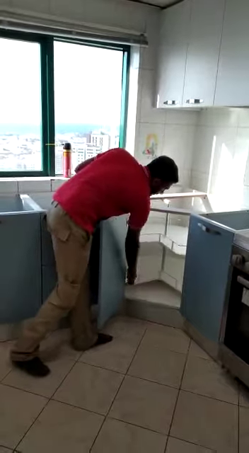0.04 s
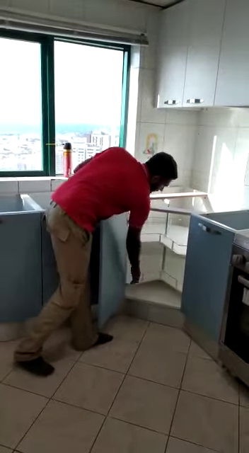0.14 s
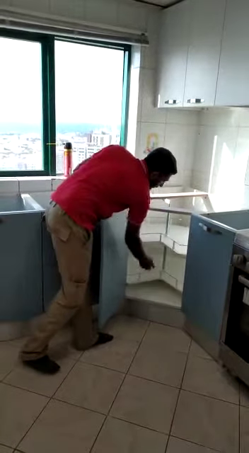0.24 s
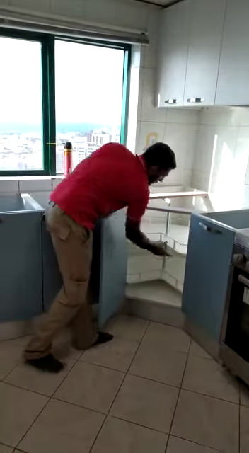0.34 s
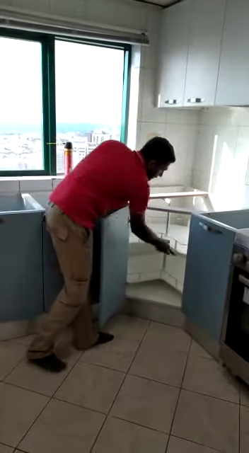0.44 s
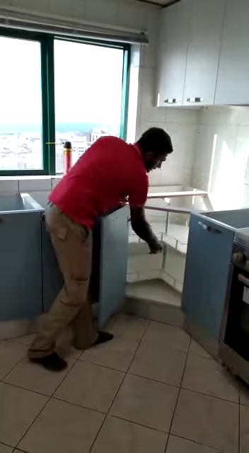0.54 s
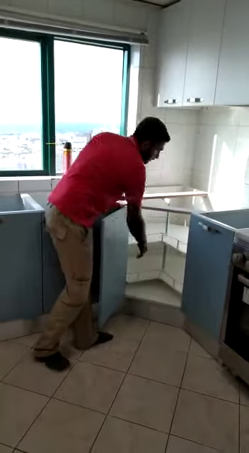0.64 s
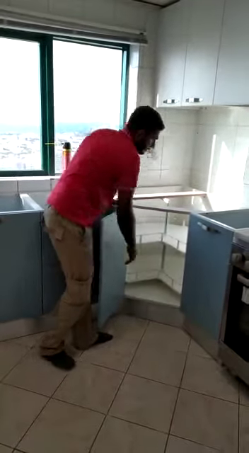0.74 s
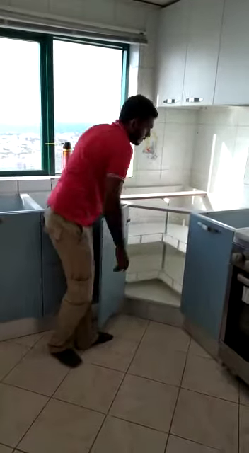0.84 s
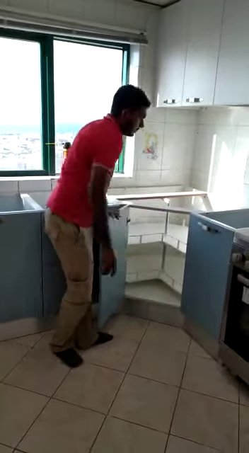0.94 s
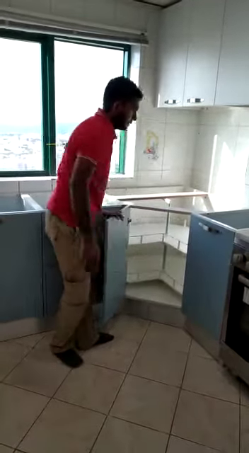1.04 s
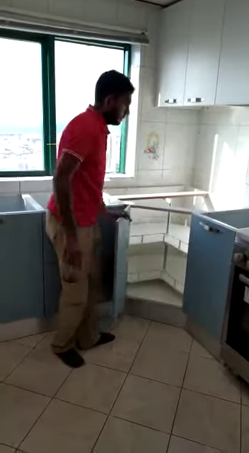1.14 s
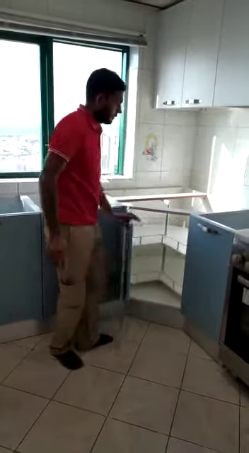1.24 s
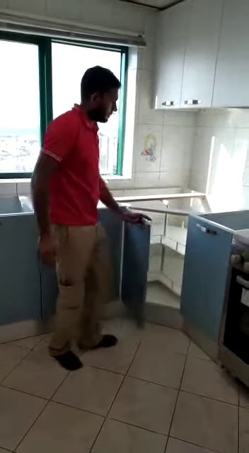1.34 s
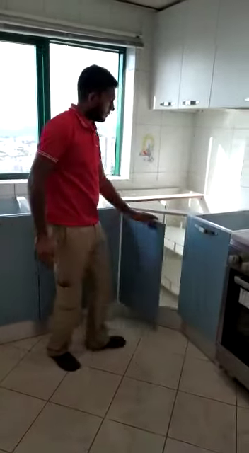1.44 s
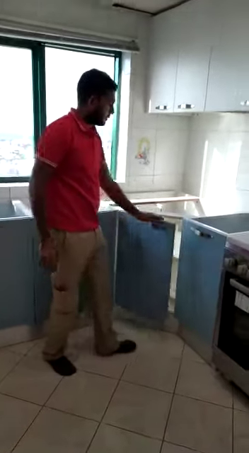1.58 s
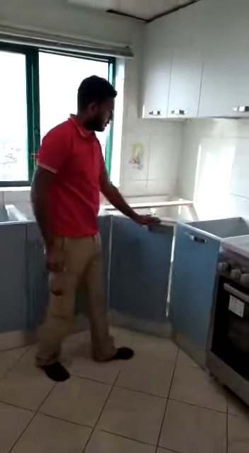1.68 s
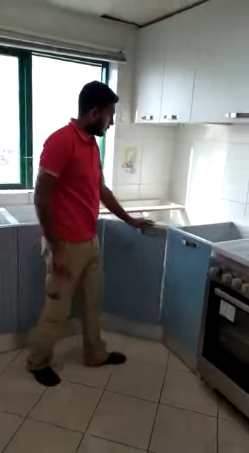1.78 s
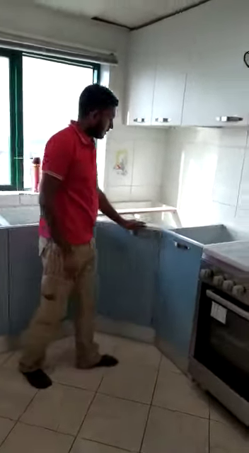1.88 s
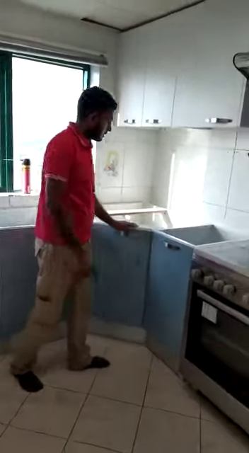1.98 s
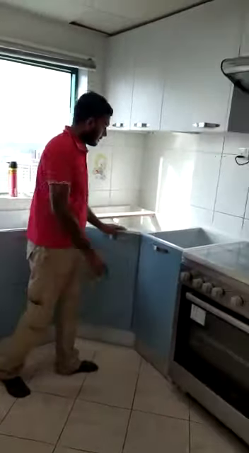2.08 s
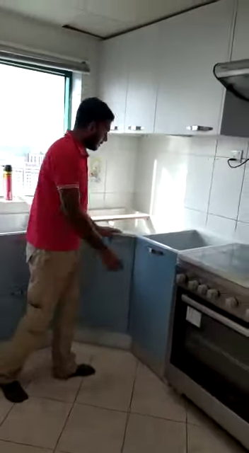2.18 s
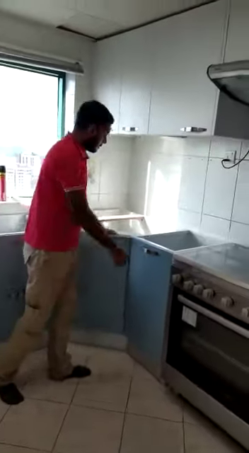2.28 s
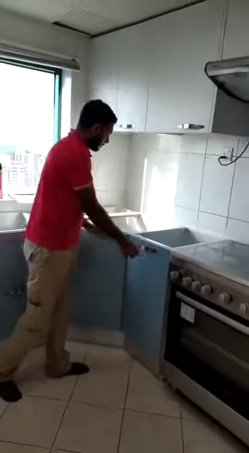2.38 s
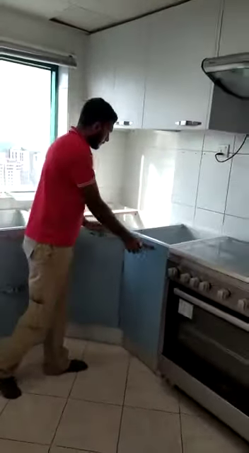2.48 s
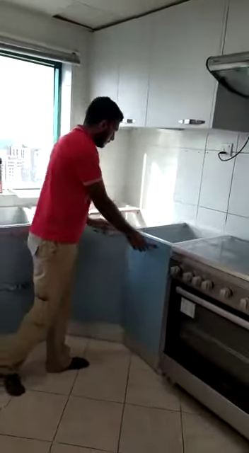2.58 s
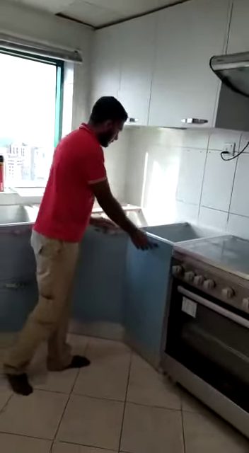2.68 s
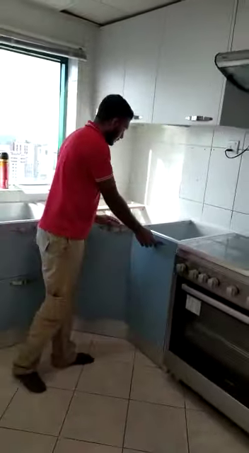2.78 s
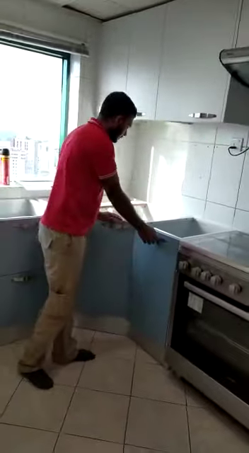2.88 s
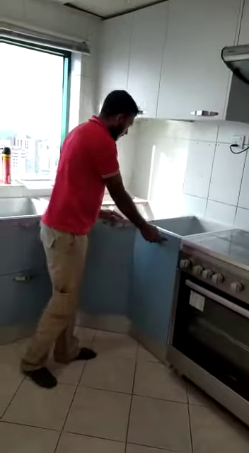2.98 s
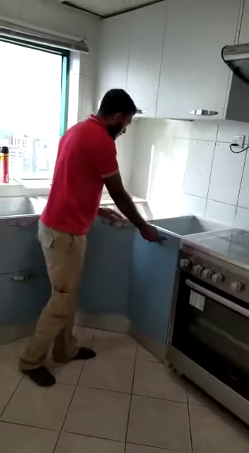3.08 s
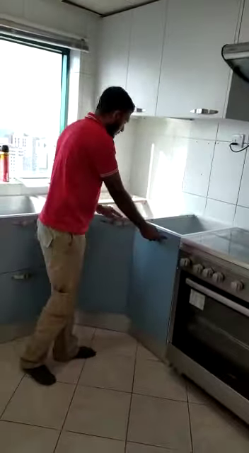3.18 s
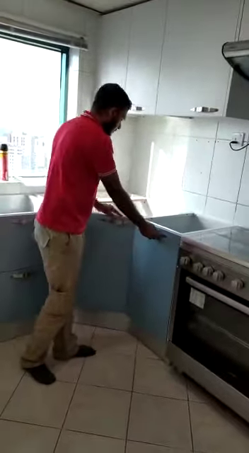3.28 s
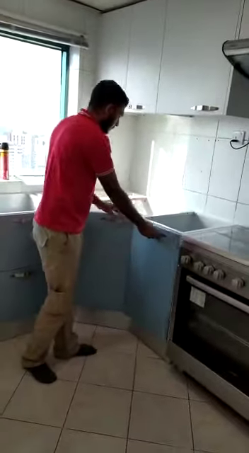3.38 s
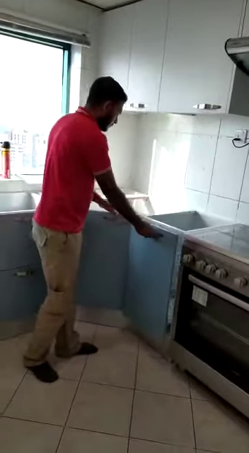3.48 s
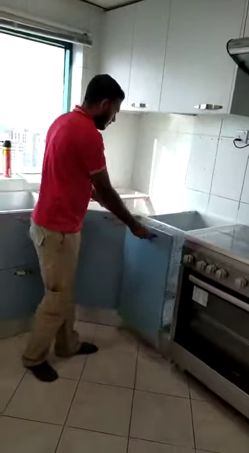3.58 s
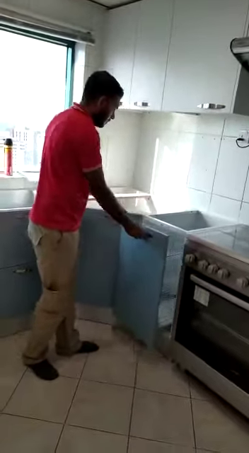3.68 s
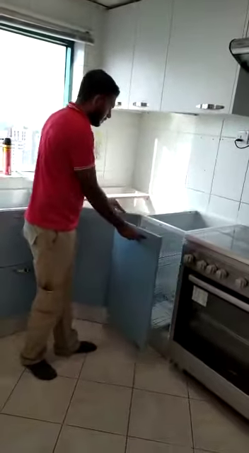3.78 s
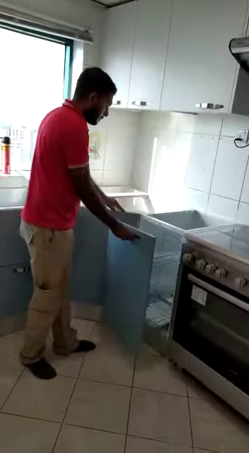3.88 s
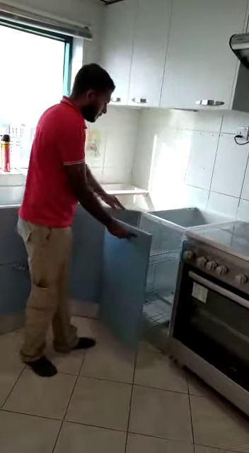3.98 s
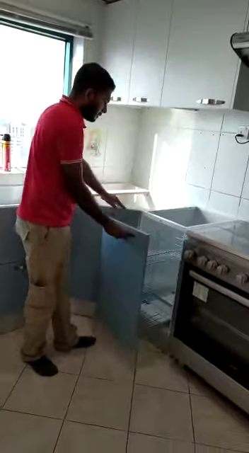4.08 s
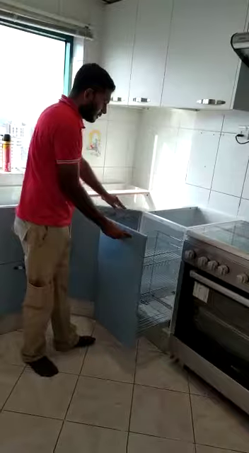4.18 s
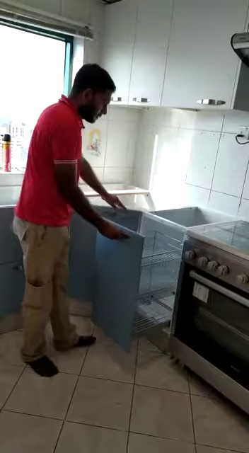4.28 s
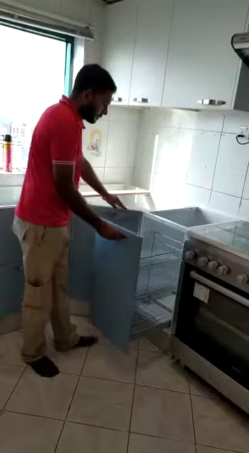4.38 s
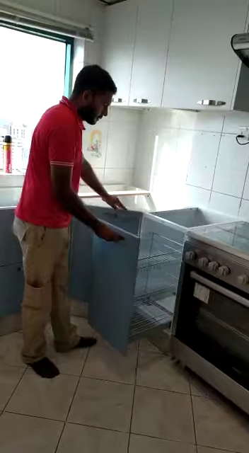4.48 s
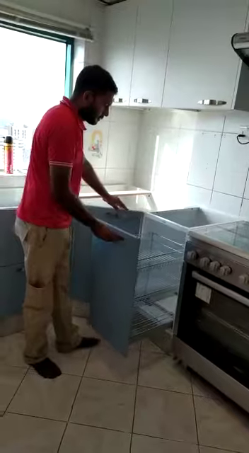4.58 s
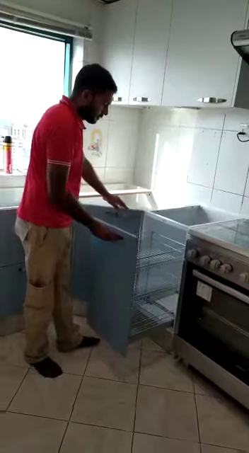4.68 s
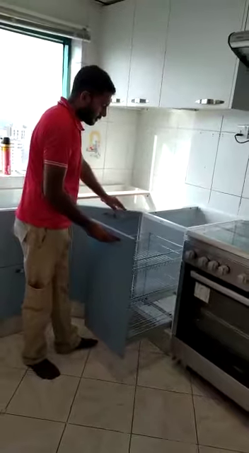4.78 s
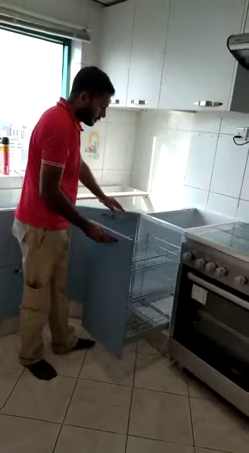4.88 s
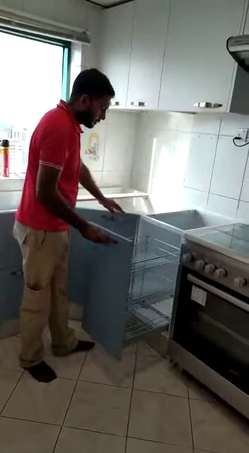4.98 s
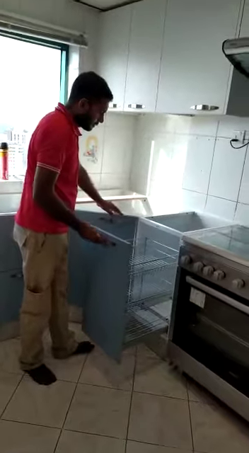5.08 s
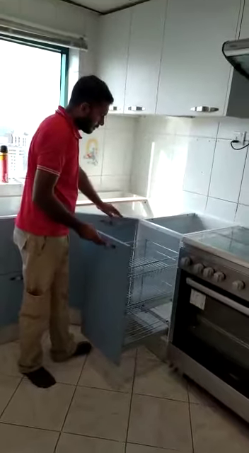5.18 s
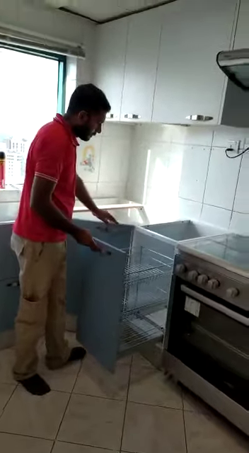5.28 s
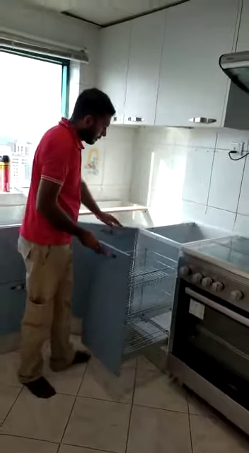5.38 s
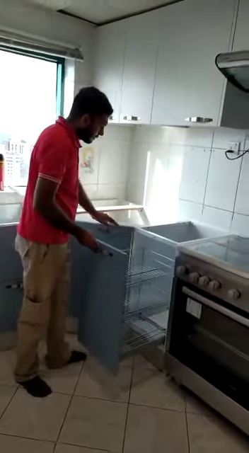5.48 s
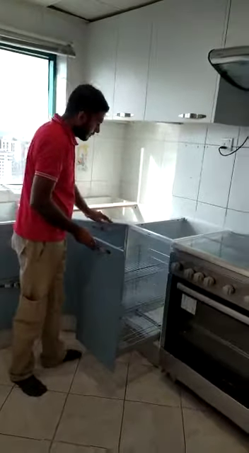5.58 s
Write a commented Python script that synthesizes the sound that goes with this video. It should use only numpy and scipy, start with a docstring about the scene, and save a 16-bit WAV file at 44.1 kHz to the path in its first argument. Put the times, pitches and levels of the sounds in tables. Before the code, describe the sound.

Steady soft traffic hum and hiss fill a reverberant tiled kitchen. Three tiny taps come first, then a sharp door bang with a ringing panel. A short singing roll leads into a heavy drawer slam with a clattering tail. Later the drawer rumbles gently out, its wire baskets clashing at the stop. Faint clicks, cloth swishes and foot shuffles follow, heard from two metres by spaced microphones.

```python
"""Cupboard door and drawer in a tiled kitchen

A spaced pair of microphones, two metres off in an empty kitchen: light taps, a door banged shut, a pull-out
drawer pushed home, then rolled out until its wire baskets clash. Blows are contacts with a dying chatter,
panels ring as decaying modes, and rollers, soft swishes and feet are grainy friction noise. Hinges click, the
town hums behind the window as shaped noise, and hard walls answer blows and rubs with slaps and a dense tail."""
import sys
import numpy as np
from scipy import signal
from scipy.io import wavfile
from scipy.ndimage import uniform_filter1d, map_coordinates

SR = 44100
rng = np.random.default_rng(int(sys.argv[2]) if len(sys.argv) > 2 else 0)


def wav_record(signal):
    """Record a signal, one row per channel, as 16-bit PCM in the file named by sys.argv[1]."""
    frames = np.transpose(np.atleast_2d(signal))
    bounded = np.clip(frames, -1, 1)
    # unit amplitude maps onto the largest positive 16-bit level
    quanta = np.round(bounded * 32767).astype(np.int16)
    wavfile.write(sys.argv[1], SR, quanta)


N = 248704
TIME = np.arange(N) / SR  # seconds
FRAME, HOP = 1024, 256  # samples, for noise built frame by frame
BINS_HZ = np.fft.rfftfreq(FRAME, 1 / SR)
EDGE_HZ = 15600  # top of the recorder's band

# Town and microphone hiss, broad colour. Each row: frequency in Hz, relative level in dB.
TOWN_COLOUR = [(25, 0.5), (60, -1.5), (115, -14.5), (200, -1), (300, -7.5), (450, -9), (640, -11.5),
               (900, -11.5), (1300, -18.5), (2500, -23.5), (5500, -31), (9500, -25.5), (12000, -40),
               (15000, -50)]
# Standing waves of the room. Each row: frequency in Hz, width in Hz, gain of the added band in dB.
ROOM_PEAKS = [(177.3, 11.7, 2.8), (201, 15, 5.1), (296.7, 11, 6.7), (346, 9.5, 3.7), (827, 64, 1.3)]
# How long the kitchen rings. Each row: frequency in Hz, time to fall 60 dB in seconds.
KITCHEN_T60 = [(60, 1.32), (170, 0.73), (400, 0.75), (1000, 0.73), (2700, 0.65), (5400, 0.59), (9500, 0.52),
               (15000, 0.5)]
# How alike the two microphones hear the room. Each row: frequency in Hz, left-right correlation (no unit).
LIKENESS = [(60, 0.91), (190, 0.99), (380, 0.57), (700, 0.3), (1300, -0.24), (2400, 0.1), (5000, -0.036)]

# Soft high swishes: clothes as the body moves, and the hiss of the drawer's runners near 2.6 and 3.6 s.
# Each row: fastest moment in seconds, level in dB before the room, length in seconds.
SWISHES = [(1.02, -55, 0.12), (1.24, -61.5, 0.34), (1.625, -52.5, 0.21), (1.89, -55, 0.092),
           (2.25, -57.5, 0.24), (2.645, -42.5, 0.13), (3.6, -54, 0.25), (4.57, -57, 0.062),
           (4.645, -50.5, 0.098), (4.775, -43.5, 0.13), (4.85, -53, 0.096), (5.42, -57.5, 0.44)]
# Feet slide on the tiles as the weight shifts.
# Each row: fastest moment in seconds, level in dB before the room, length in seconds.
SHUFFLES = [(1.24, -56.5, 0.5), (2.43, -50, 0.2), (4.72, -53, 0.035), (5.3, -60, .3)]
# The open drawer creeps on its runners.
# Each row: fastest moment in seconds, level in dB before the room, length in seconds.
CREEPS = [(5.32, -62.5, 0.3)]
RUSTLE_DB = -69.5  # the clothes are never quite still; level before the room
# Colour of the soft high swishes. Each row: frequency in Hz, relative level in dB.
SWISH_COLOUR = [(500, -27), (2000, -10.5), (4000, -8.5), (6500, -5), (9300, 5.5), (12000, -9), (15000, -23)]
# Colour of the creeping drawer's faint squeak. Each row: frequency in Hz, relative level in dB.
SQUEAK_COLOUR = [(1300, -33), (1590, -15), (1660, 3), (1740, -12), (2100, -28)]

# Hinges, runner catches and wire baskets.
# Each row: start in seconds, level in dB, tilt in dB per octave, chatter decay in seconds.
CLICKS = [(1.622, -52, -0.5, 0.006), (2.48, -46.5, -3, 0.022), (3.41, -54, 3, 0.0075),
          (3.766, -42, 2.5, 0.005), (3.9458, -34, 2, 0.0066), (3.956, -35, 0, 0.0061),
          (4.227, -55, 7, 0.0066), (4.395, -62, 6, 0.0044)]
# Dull bumps of the cabinet body.
# Each row: start in seconds, level in dB, tilt in dB per octave, chatter decay in seconds.
BUMPS = [(2.176, -41, -2, 0.004), (2.405, -54, -4.5, 0.008), (2.876, -38.5, -7, 0.0044),
         (3.655, -50, -3, 0.0035), (3.975, -36.5, -6, 0.0077), (4.08, -45, -6.5, 0.0086),
         (4.235, -45, -9.5, 0.013)]
# The hollow row of cabinets booms after a blow. Each row: start in seconds, level in dB, swell in seconds.
BOOMS = [(2.15, -33.5, 0.026), (3.965, -40, .004)]
# Two close air modes that beat. Each row: frequency in Hz, relative level in dB, time to fall 60 dB in seconds.
CABINET_MODES = [(163.7, .5, 1.26), (172.6, .5, 1.28)]
# Colour of struck metal. Each row: frequency in Hz, relative level in dB.
METAL_COLOUR = [(50, -15), (200, -4.5), (800, -16), (2500, -8.5), (3800, -18), (5200, -10), (6500, -15),
                (9500, -8.5), (12000, -23.5), (15000, -36)]

# Light taps while the door is still open.
# Each row: start in seconds, level in dB before the resonances, tilt in dB per octave, chatter decay in seconds.
TAPS = [(.726, -47, 0, 0.0053), (.749, -49.5, -0.5, 0.0034), (.788, -46.5, 0.5, 0.0043)]
# Colour of the taps. Each row: frequency in Hz, relative level in dB.
TAP_COLOUR = [(50, -14), (200, -3), (550, -2), (1300, -0.5), (2100, -4), (4000, -5.5), (6000, -8),
              (9500, -2.5), (12000, -13.5), (15000, -32)]
# Resonances of the taps. Each row: frequency in Hz, width in Hz, gain of the added band in dB.
TAP_PEAKS = [(1400, 180, 1), (2670, 100, 3.5)]
# The door meets the cabinet, edge first, then flat.
# Each row: start in seconds, level in dB, tilt in dB per octave, chatter decay in seconds.
DOOR_HITS = [(1.9502, -21.5, 3, 0.0027), (1.957, -22, -.5, 0.0023), (1.9655, -25, -3, 0.0023),
             (1.978, -28.5, -2.5, 0.0012), (2.005, -32, -2, 0.002)]
# Colour of the struck door. Each row: frequency in Hz, relative level in dB.
DOOR_COLOUR = [(30, -21), (65, -13.5), (100, -11), (170, -2.5), (400, -4), (800, -1.5), (1700, -2.5),
               (2900, -9.5), (4200, -20.5), (6500, -30), (9700, -35), (12000, -62), (15000, -75)]
# Ring of the door with the cabinet behind it.
# Each row: frequency in Hz, relative level in dB, time to fall 60 dB in seconds.
DOOR_MODES = [(136, 3, 0.37), (211, -10, 0.68), (286, -2.5, 0.59), (322.5, 1, 0.57), (349, 3.5, 0.65),
              (495, -1, 0.66), (613, 1.5, 0.76), (644, 3.5, 0.34), (777, -2.5, 0.98), (947, -3, 0.43),
              (1001, -5, 0.66), (1380, -6, 0.86), (1695, -5.5, 0.61), (1900, -3, 0.53), (2010, -11, 0.92),
              (2537, -4.5, 0.54)]
# The whole door flexes and is soon stilled by its frame.
# Each row: frequency in Hz, relative level in dB, time to fall 60 dB in seconds.
DOOR_FLEX = [(144.4, 0, 0.21), (203.4, -3.5, 0.3), (480, -10, 0.31), (636, -2, .14)]

# The drawer's runs, in and out. Each row: start in seconds, end in seconds, level at top speed in dB before
# the room and resonances, time to top speed in seconds, slowing in dB per second.
RUN_IN = (2.515, 2.655, -35.5, .12, 50)
RUN_OUT = (3.385, 3.96, -42.2, .25, 15)
RUN_LAW = .9  # power of the speed that gives the gain
# Baskets shiver on at the stop. The row: start in seconds, level in dB before the room, fade in dB per second.
SHIVER = (3.95, -46, 27)
# Colour of the rollers, and of the feet. Each row: frequency in Hz, relative level in dB.
ROLLER_COLOUR = [(40, -21), (200, -1.5), (600, -1.5), (1800, -5), (3000, -14), (4500, -21.5), (6500, -20),
                 (9500, -17), (12000, -33), (15000, -49)]
# Singing of the runners. Each row: frequency in Hz, width in Hz, gain of the added band in dB.
RUNNER_PEAKS = [(711.6, 27, 11), (483, 15, -2)]
# The steel catch snaps twice as the drawer slams.
# Each row: start in seconds, level in dB, tilt in dB per octave, chatter decay in seconds.
CATCH = [(2.657, -43, -2, .0003), (2.663, -39, -3.5, .0005)]
# The drawer front slams home, and its baskets jump and settle.
# Each row: start in seconds, level in dB, tilt in dB per octave, chatter decay in seconds.
DRAWER_HITS = [(2.6575, -24.5, 5, 0.0033), (2.662, -19.5, .5, 0.0031), (2.677, -23, -1, 0.0043),
               (2.713, -34, -4, 0.002), (2.76, -33.5, -1.5, 0.0034), (2.795, -31.5, -1.5, 0.01),
               (2.84, -36.5, -1.5, 0.006), (2.902, -42.5, -2.5, 0.0046)]
# Colour of the struck drawer. Each row: frequency in Hz, relative level in dB.
DRAWER_COLOUR = [(30, -24), (65, -9.5), (100, -18), (170, 2.5), (400, -1), (800, -2.5), (1700, -3.5),
                 (2900, -6), (4200, -18.5), (6500, -22.5), (9700, -25), (12000, -61), (15000, -76)]
# Ring of the drawer front with the cabinet behind it.
# Each row: frequency in Hz, relative level in dB, time to fall 60 dB in seconds.
DRAWER_MODES = [(170, -4.5, 0.77), (226.2, 0, 0.87), (249.6, -5, 1.27), (505, -4, 1.0), (604, -6, 0.82),
                (782, -1, 0.92), (876, 5.5, 0.54), (973, -3.5, 0.95), (1043, 1.5, 0.69), (1386, -3, 0.75),
                (1643, -9, 0.85), (2500, -9, 0.49)]
# The whole drawer front flexes and is soon stilled by its frame.
# Each row: frequency in Hz, relative level in dB, time to fall 60 dB in seconds.
DRAWER_FLEX = [(61.6, -5.5, 0.2), (183, -5, 0.17), (216.4, 2, 0.24)]


def amp(db):
    """Decibels to gain."""
    return 10 ** (np.asarray(db) / 20)


def evened(x):
    """Scales to an rms of one."""
    return x / np.sqrt(np.mean(x ** 2) + 1e-20)


def read(points, hz):
    """Reads a table on a log-frequency axis."""
    f, value = np.transpose(points)
    return np.interp(np.log(hz + 1), np.log(f + 1), value)


def add(mix, s, sound):
    """Mixes a stereo sound in at a given time, cut at the end of the mix."""
    part = mix[:, round(s * SR):][:, :sound.shape[1]]
    part += sound[:, :part.shape[1]]


def wander(size, per_s):
    """Smooth random curve of rms near one, through per_s random points a second."""
    knots = rng.standard_normal(2048)
    return map_coordinates(knots, [np.arange(size) * per_s / SR], order=3, mode="wrap")


def colour(spectrum, tilt_db=0, trim_db=0, size=4096):
    """Causal (minimum-phase) response of unit energy with a given spectrum and tilt."""
    hz = abs(np.fft.fftfreq(size, 1 / SR))
    octaves = np.log2(np.clip(hz, 170, 9000) / 1000)  # the tilt turns about 1 kHz
    log_gain = np.log(amp(read(spectrum, hz) + tilt_db * octaves + trim_db))
    minimum_phase = np.exp(np.conj(signal.hilbert(log_gain)))
    response = np.fft.ifft(minimum_phase).real[:size // 2]
    return response / np.linalg.norm(response)


def resonant(x, peaks):
    """Resonance: adds narrow bands of the sound to itself."""
    out = x
    for hz, width_hz, db in peaks:
        b, a = signal.iirpeak(hz, hz / width_hz, fs=SR)
        out = out + amp(db) * signal.lfilter(b, a, x)
    return out


def diffuse(field_db, size):
    """Noise from all sides at two close microphones, shaped by field_db(time): the bass is alike in both."""
    t = np.arange(size // HOP + 5)[:, None] * HOP / SR
    a, b, c, d = rng.standard_normal((4, len(t), len(BINS_HZ)))
    likeness = np.clip(read(LIKENESS, BINS_HZ), -1, 1)
    left = a + 1j * b
    right = likeness * left + np.sqrt(1 - likeness ** 2) * (c + 1j * d)
    frames = np.array([left, right]) * amp(field_db(t))
    sound = signal.istft(frames.swapaxes(1, 2), nperseg=FRAME, noverlap=FRAME - HOP)[1]
    return sound[:, :size]


def kitchen(x, direct=0.044, build_s=0.00023, slap=.12, slap_s=.04, count=8):
    """Direct sound, single slaps off the nearest tiles, then dense reflections, each band dying at its own speed."""
    t = np.arange(SR) / SR
    response = diffuse(lambda age: -60 * age / read(KITCHEN_T60, BINS_HZ), len(t))
    response *= 1 - np.exp(-t / build_s)
    response /= np.sqrt(np.sum(response ** 2) / 2)
    response[:, 0] += direct
    for when, left, right in rng.random((count, 3)):
        # each slap reaches the two microphones up to 20 samples apart
        at = np.round(when * slap_s * SR + 20 * np.array([left, right])).astype(int)
        response[[0, 1], at] += slap * rng.choice([-1, 1])
    return signal.fftconvolve(x[None], response, axes=1)


def blows(rows, spectrum, rattle, direct, chatter_per_s=700, size=4096):
    """Each blow is one hard contact and a dying chatter of smaller ones, sounding through the struck thing."""
    out, t = np.zeros((2, N)), np.arange(size) / SR
    for s, db, tilt_db, chatter_s in rows:
        chatter = rng.standard_normal(size) * (rng.random(size) < chatter_per_s / SR)
        force = rattle * chatter * np.exp(-t / chatter_s)
        force[0] = 1
        # the chatter only spreads the blow in time; the broad colour belongs to the struck thing
        power = uniform_filter1d(abs(np.fft.fft(force)) ** 2, size=11, mode="wrap")
        ripple_db = 10 * np.log10(power + 1e-6)
        struck = signal.fftconvolve(force, colour(spectrum, tilt_db, -ripple_db))
        sound = kitchen(struck, direct)
        opening_rms = np.sqrt(np.mean(sound[:, :SR // 20] ** 2))  # over the first 50 ms
        add(out, s, amp(db) * sound / opening_rms)
    return out


def ring(s, modes, db, swell_s, waver_hz=1.7, waver_per_s=30):
    """Modes swell from rest, waver in pitch and die; high ones reach the two microphones out of step."""
    out, t = np.zeros((2, N)), np.arange(SR * 3 // 2) / SR
    for hz, mode_db, t60 in modes:
        # the phase gap whose cosine is the left-right correlation
        apart = np.arccos(np.clip(read(LIKENESS, hz), -1, 1)) * rng.choice([-1, 1])
        turns = np.cumsum(hz + waver_hz * wander(len(t), waver_per_s)) / SR
        phase = 2 * np.pi * turns + apart * np.array([[-.5], [.5]])
        decay = amp(mode_db - 60 * t / t60)
        swell = 1 - np.exp(-t / swell_s)
        add(out, s, amp(db) * decay * swell * np.sin(phase))
    return out


def rub(gain, spectrum, grains_per_s, smooth, uneven_db=2, snags_per_s=90):
    """Friction: tiny catches over a smooth hiss, following the movement's gain, snagging and easing as it goes."""
    grains = rng.standard_normal(N) * (rng.random(N) < grains_per_s / SR)
    hiss = smooth * rng.standard_normal(N)
    force = (evened(grains) + hiss) / np.hypot(1, smooth)
    force *= evened(amp(uneven_db * wander(N, snags_per_s)))
    dry_rub = signal.oaconvolve(force * gain, colour(spectrum))[:N]
    return kitchen(dry_rub)[:, :N]


def strokes(rows, skirt=1.3):
    """Gain of brief movements: each swells to its fastest moment and dies away alike."""
    return sum(amp(db) * np.exp(-abs(2 * (TIME - s) / length_s) ** skirt) for s, db, length_s in rows)


def rolling(start_s, end_s, db, pickup_s, slowing_db_per_s):
    """Gain of one run of the drawer: it gathers speed from rest, eases off, and is stopped dead."""
    age = TIME - start_s
    speed = np.sin(np.pi / 2 * np.clip(age / pickup_s, 0, 1))
    easing = amp(db - slowing_db_per_s * np.maximum(age - pickup_s, 0))
    return speed ** RUN_LAW * easing * (TIME < end_s)


def dying(s, db, fade_db_per_s):
    """Gain of a rattle that starts at once and fades steadily."""
    return amp(db - fade_db_per_s * np.maximum(TIME - s, 0)) * (TIME >= s)


def town(db=-48.5):
    """Far traffic and microphone hiss as one steady noise, coloured by the room's standing waves."""
    wash = diffuse(lambda t: read(TOWN_COLOUR, BINS_HZ), N)
    return amp(db) * evened(resonant(wash, ROOM_PEAKS))


def small_movements():
    """Friction noise: clothes and runners swish, feet slide, and the open drawer creeps with a faint squeak."""
    swish_gain = np.hypot(strokes(SWISHES, skirt=1.3), amp(RUSTLE_DB))
    swishes = rub(swish_gain, SWISH_COLOUR, grains_per_s=2500, smooth=1.0)
    feet = rub(strokes(SHUFFLES, skirt=0.96), ROLLER_COLOUR, grains_per_s=370, smooth=0.53)
    squeak = rub(strokes(CREEPS, skirt=2.0), SQUEAK_COLOUR, grains_per_s=270, smooth=.5)
    return swishes + feet + squeak


def cabinets():
    """Metal fittings click out of sight; the wooden body bumps and its air modes boom."""
    clicks = blows(CLICKS, METAL_COLOUR, rattle=0.57, direct=0.063)
    bumps = blows(BUMPS, DOOR_COLOUR, rattle=0.47, direct=0.12)
    booms = sum(ring(s, CABINET_MODES, db, swell_s, waver_hz=1.2) for s, db, swell_s in BOOMS)
    return clicks + bumps + booms


def door():
    """Light taps, then the hinged door bangs shut: contacts, a short flexing thud and a longer panel ring."""
    taps = resonant(blows(TAPS, TAP_COLOUR, rattle=0.78, direct=0.27), TAP_PEAKS)
    bang = blows(DOOR_HITS, DOOR_COLOUR, rattle=0.52, direct=0.21)
    thud = ring(1.959, DOOR_FLEX, db=-25.0, swell_s=0.0028)
    panel = ring(1.955, DOOR_MODES, db=-25, swell_s=0.0022)
    return taps + bang + thud + panel


def drawer():
    """The drawer rolls in with singing runners, slams and rings, and later rolls out to a shivering stop."""
    inward = resonant(rub(rolling(*RUN_IN), ROLLER_COLOUR, grains_per_s=500, smooth=0.36), RUNNER_PEAKS)
    outward_gain = rolling(*RUN_OUT) + dying(*SHIVER)
    outward = rub(outward_gain, ROLLER_COLOUR, grains_per_s=260, smooth=0.33)
    snap = blows(CATCH, METAL_COLOUR, rattle=.4, direct=0.78)
    slam = blows(DRAWER_HITS, DRAWER_COLOUR, rattle=0.68, direct=0.22)
    thud = ring(2.667, DRAWER_FLEX, db=-20.5, swell_s=0.0043)
    panel = ring(2.663, DRAWER_MODES, db=-25.5, swell_s=0.0026)
    return inward + outward + snap + slam + thud + panel


def scene():
    """All sources in the one room, the left channel half a decibel above the right."""
    mix = town() + small_movements() + cabinets() + door() + drawer()
    return mix * amp([[.25], [-.25]])


def record(dry):
    """The band limit of the recorder: a steep low-pass."""
    lowpass = signal.firwin(511, EDGE_HZ, window=("kaiser", 9), fs=SR)
    return signal.oaconvolve(dry, lowpass[None], "same")


dry = scene()
out = record(dry)
wav_record(out)
```